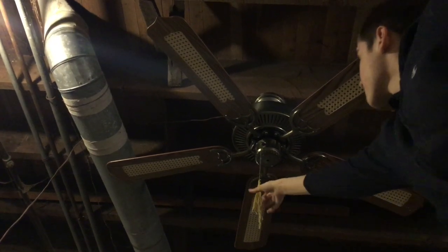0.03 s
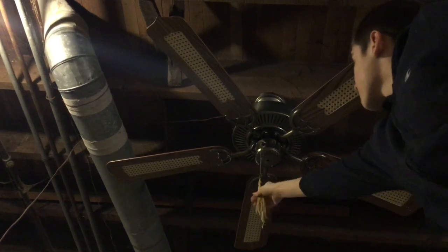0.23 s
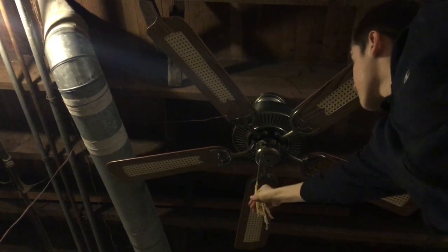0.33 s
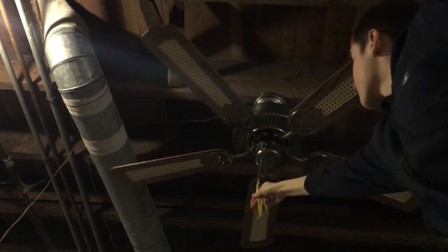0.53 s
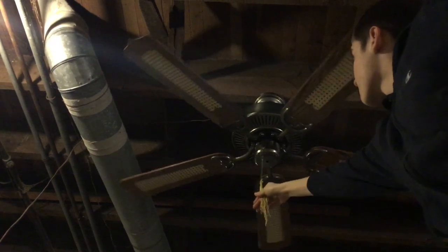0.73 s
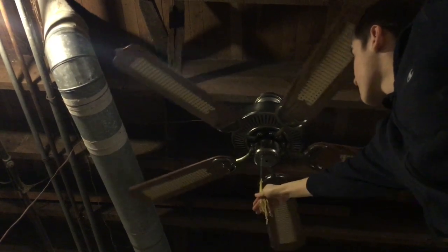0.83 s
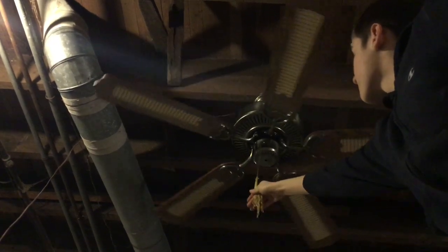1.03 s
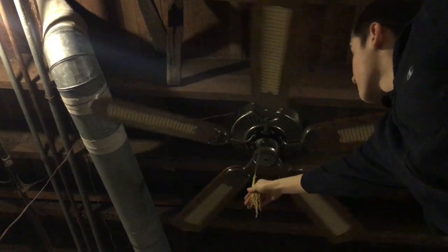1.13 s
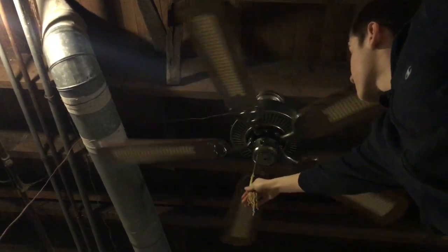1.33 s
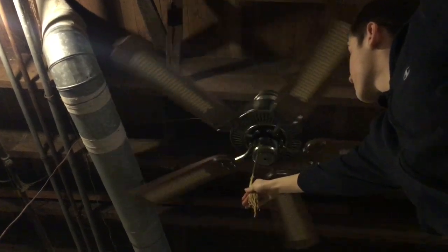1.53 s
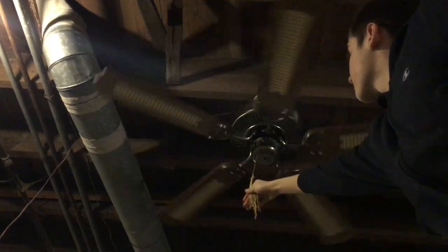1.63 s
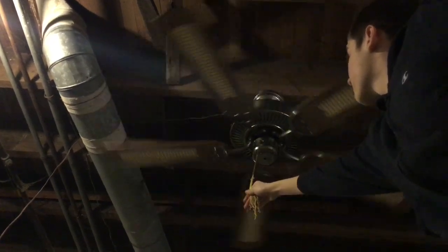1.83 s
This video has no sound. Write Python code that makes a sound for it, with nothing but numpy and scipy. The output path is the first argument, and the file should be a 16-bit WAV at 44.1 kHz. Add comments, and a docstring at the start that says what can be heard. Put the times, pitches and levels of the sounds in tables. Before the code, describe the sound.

A ceiling fan's pull-chain switch ticks quickly around 0.4 seconds and snaps sharply at 0.6, with a brief metallic ring in a quiet basement. Dull hollow knocks and soft low thumps, like handling close to the microphone, cluster from 0.2 to 1.1 seconds, with another clear knock at 1.6. After the snap, a faint motor hum fades in and continues over low rumble and hiss.

```python
"""Dull hollow knocks and soft low thumps, probably from handling, close to the microphone.
Among them a ceiling fan is switched on by its pull chain, in a quiet basement: the switch ticks as
the chain is drawn and snaps as it is let go, ringing its metal housing and the room.
The motor then hums faintly on the mains, over low rumble and hiss. One microphone, mono."""
import sys
import numpy as np
from scipy import signal
from scipy.fft import rfft, irfft
from scipy.io import wavfile

SR = 44100
rng = np.random.default_rng(int(sys.argv[2]) if len(sys.argv) > 2 else 0)


def dump(signal):
    """Clip the signal to [-1, 1] and save it as 16-bit WAV at the path in sys.argv[1]."""
    limited = np.clip(np.atleast_2d(signal).T, -1, 1)
    pcm = np.round(limited * 32767).astype(np.int16)
    wavfile.write(sys.argv[1], SR, pcm)


N = 83790
T = np.arange(N) / SR
BIN_HZ = np.arange(1, N // 2 + 2) * SR / N   # spectrum axis, one bin up to avoid 0 Hz


def pull_switch():
    """The pawl snaps and rings, the basement answers, and the metal housing colours each click."""
    # ticks and snaps of the switch: (time [s], level [dB], treble tilt [dB per two octaves])
    clicks = [(.3605, -43, -10), (.372, -20.5, -20.5), (.385, -27, 0), (.4142, -13.5, -7),
              (.4286, -8.5, -4.5), (.6115, -17, -2.5), (.632, -1, -1)]
    # ring of the pawl: (frequency [Hz], level [dB], T60 [s])
    pawl_modes = [(1330, -54.5, 0.018), (3220, -46, 0.018), (4250, -43.5, .012), (4910, -51, 0.015),
                  (7220, -50.5, 0.02), (9200, -46, .008), (11270, -47, 0.009)]
    # resonances of the housing: (frequency [Hz], width [Hz], gain [dB])
    housing_modes = [(720, 35, 5.5), (1169, 50, 4), (1320, 120, -0.5), (2155, 72, 7), (2353, 12, -11),
                     (2616, 10, 3), (3040, 38, -2.5), (3200, 480, 2), (4555, 120, 9), (5260, 220, 0),
                     (7370, 200, 2.5), (8450, 170, 3), (11860, 400, 6)]
    # the snap, heard direct: (frequency [Hz], density [dB])
    snap_spectrum = [(700, -15), (1300, 2), (2200, 10.5), (3200, 7.5), (3800, 5), (4700, 11.5),
                     (6200, -5.5), (7800, 9.5), (11500, -3), (15500, -11)]
    # the snap, back off the walls: (frequency [Hz], density [dB])
    room_spectrum = [(500, 5.5), (750, 3.5), (1600, -7), (2200, -3.5), (3300, -6.5), (4800, -8),
                     (6200, -15), (8000, -8.5), (11500, -17), (15500, -15)]
    # reverberation time of the basement: (frequency [Hz], T60 [s])
    room_t60s = [(500, 0.62), (1850, 0.69), (4880, 0.56), (8000, .34), (13000, 0.23)]
    hold_s, room_delay_s = 0.0024, 0.0052
    snap, early = noise(snap_spectrum), noise(room_spectrum)
    tail = from_db(-56) * noise(room_spectrum, room_t60s)
    burst = from_db(-48) * decay(t60=0.012, after_s=hold_s)
    pawl = sum(from_db(db) * decay(t60) * np.sin(2 * np.pi * hz * T) for hz, db, t60 in pawl_modes)
    pawl *= ramp(hold_s / 2)
    out = 0
    for start_s, db, tilt_db in clicks:
        room = tail + from_db(-51.5) * fresh(early) * decay(t60=0.2)
        click = pawl + burst * fresh(snap) + delayed(room, room_delay_s)
        out += from_db(db) * delayed(tilted(click, tilt_db), start_s)
    return resonant(out, housing_modes)


def knocks():
    """Each close knock travels as a bending wave, treble first, rings a shell and is reflected once."""
    # contacts on the hollow shell: (time [s], level [dB], hardness [dB per octave])
    contacts = [(.012, -33, 3.5), (0.177, -23.5, 0), (0.2304, -4, 3.5), (0.2431, -2, -3),
                (0.285, -19.5, -5), (0.348, -10, -3), (0.3597, -12.5, -1), (0.4707, -6, -2.5),
                (.508, -5, 0.5), (0.682, -3, -2), (0.7228, -14, -8), (.8325, -18.5, 1.5), (0.9248, -11, -3),
                (1.068, -12.5, -10.5), (1.593, -1, 2), (1.6946, -18.5, 0.5), (1.7803, -17.5, -4.5)]
    # the dull contact: (frequency [Hz], density [dB])
    contact_spectrum = [(40, -19), (100, 1.5), (300, -2.5), (750, -8), (1050, -21.5), (1600, -23),
                        (2100, -39.5), (3300, -38), (4000, -52), (6000, -89), (12000, -104)]
    # its woody edge: (frequency [Hz], density [dB])
    crack_spectrum = [(700, 13), (1100, 5.5), (1700, -1), (2050, -11), (2800, -7), (3500, -18), (4200, -30),
                      (6000, -39)]
    # resonances of the shell: (frequency [Hz], width [Hz], gain [dB])
    shell_modes = [(134.3, 9.2, 10.5), (204, 10.3, 18), (299.7, 35.5, 22), (356, 10, 6), (503, 14, -4.5),
                   (660, 110, -10), (794.2, 24, 12.5), (889, 6.7, 7.5), (1398, 64, -3), (1852, 15, 1),
                   (2308, 45, 10.5), (2687, 42, 10), (3520, 220, -5)]
    travel_s, reference_hz = 0.004914, 300   # the wave's travel time at this frequency
    phase_delay_s = 2 * travel_s * np.sqrt(reference_hz / BIN_HZ)
    octaves_above = np.clip(np.log2(BIN_HZ / reference_hz), 0, 2)
    scatter, crack = noise(contact_spectrum), noise(crack_spectrum)
    out = 0
    for start_s, db, hard_db in contacts:
        gain = from_db(at_hz(contact_spectrum, BIN_HZ) + hard_db * octaves_above)
        pulse = irfft(gain * np.exp(-2j * np.pi * BIN_HZ * (start_s + phase_delay_s)), N)
        after_ring = from_db(-55 + hard_db) * fresh(scatter) * decay(t60=0.14) * ramp(2 * travel_s)
        edge = from_db(-53 + 2 * hard_db) * fresh(crack) * decay(t60=0.036) * ramp(travel_s / 2)
        out += from_db(db) * (pulse + delayed(after_ring + edge, start_s + travel_s / 2))
    shell = resonant(out, shell_modes)
    reflection = from_db(-13.5) * delayed(shell, seconds=0.0131)
    return shell + reflection


def thumps():
    """Soft pushes near the microphone swell a low resonance, which then dies away."""
    # soft pushes: (time [s], level [dB], pitch [Hz], rise [s])
    pushes = [(.348, -49.5, 177.3, .008), (.358, -36, 100.8, 0.014), (0.417, -38.5, 89.2, 0.048),
              (0.466, -35.5, 88.3, 0.039), (0.503, -46.5, 80.9, 0.038), (.555, -38.5, 83.8, 0.017),
              (0.609, -45.5, 66.3, 0.051), (0.651, -44.5, 94.5, 0.059), (.71, -37.5, 90, 0.0092),
              (0.786, -50.5, 76, 0.036), (.927, -52, 126, 0.0057), (1.019, -55, 73.4, 0.037),
              (1.443, -53, 138.4, 0.0082), (1.469, -47, 98.6, 0.012), (1.599, -52.5, 110, 0.006),
              (1.782, -52, 119, 0.012)]
    hold_s = 0.0079
    out = 0
    for start_s, db, hz, rise_s in pushes:
        envelope = np.sin(np.pi / 2 * ramp(rise_s)) * decay(t60=0.12, after_s=rise_s + hold_s)
        out += delayed(from_db(db) * envelope * np.sin(2 * np.pi * hz * T), start_s)
    return out


def motor():
    """The fan overhead hums on even mains harmonics once the switch has closed; each wavers a little."""
    # motor hum: (multiple of the mains frequency, level [dB])
    harmonics = [(2, -65.5), (4, -65.5), (6, -65), (8, -72.5), (10, -87)]
    mains_hz, waver_db = 60, 0.3
    knots = np.linspace(0, T[-1], 30)
    out = 0
    for order, db in harmonics:
        waver = np.interp(T, knots, rng.standard_normal(len(knots)))
        cycles = order * mains_hz * T + rng.random()
        out += from_db(db + waver_db * waver) * np.sin(2 * np.pi * cycles)
    return out * ramp(rise_s=0.63, after_s=0.63)


def scuffs():
    """Something being handled gives short swells of dull friction noise."""
    # brief rubs: (time [s], length [s], level [dB])
    rubs = [(.008, 0.031, -68), (0.359, 0.038, -58.5), (0.829, 0.026, -63), (.915, 0.036, -61.5)]
    # friction noise: (frequency [Hz], density [dB])
    friction_spectrum = [(250, 2.5), (450, 6), (800, -3), (1500, -4), (2100, -12), (3200, -24.5),
                         (5000, -36)]
    swells = sum(from_db(db) * np.sin(np.pi * ramp(length_s, start_s)) for start_s, length_s, db in rubs)
    return swells * noise(friction_spectrum)


def room_tone():
    """The basement behind it all: uneven low rumble, steady hiss and a fading rustle."""
    # rise and fall of the rumble: (time [s], level [dB])
    rumble_levels = [(0, -58), (.16, -69.5), (.33, -64), (.42, -51), (.75, -58.5), (.9, -55), (1.13, -64.5),
                     (1.25, -64), (1.4, -61), (1.9, -64.5)]
    # low rumble: (frequency [Hz], density [dB])
    rumble_spectrum = [(30, -24.5), (48, -21.5), (68, -1), (100, -8.5), (150, -9.5), (300, -17.5),
                       (500, -23), (800, -34), (1500, -46)]
    # broad hiss: (frequency [Hz], density [dB])
    hiss_spectrum = [(100, 9.5), (400, 4.5), (800, 7), (1500, 2.5), (3000, 1.5), (6000, -2), (12000, -3.5),
                     (16000, -12.5)]
    # faint rustle: (frequency [Hz], density [dB])
    rustle_spectrum = [(250, 4.5), (500, 21.5), (800, -11), (1600, 1.5), (3300, -5.5), (4800, -11)]
    rumble = from_db(np.interp(T, *np.transpose(rumble_levels))) * noise(rumble_spectrum)
    hiss = from_db(-79.5) * noise(hiss_spectrum)
    rustle = from_db(-67.5) * decay(t60=1.7) * noise(rustle_spectrum)
    return rumble + hiss + rustle


def from_db(db):
    """Decibels to gain."""
    return 10 ** (np.asarray(db) / 20)


def at_hz(points, hz):
    """Read a table on a log-frequency axis."""
    frequencies, values = np.transpose(points)
    return np.interp(np.log(hz), np.log(frequencies), values)


def ramp(rise_s, after_s=0):
    """Wait, then rise in a straight line from 0 to 1."""
    return np.clip((T - after_s) / rise_s, 0, 1)


def decay(t60, after_s=0):
    """Hold at 1, then fall 60 dB every t60 seconds."""
    return from_db(-60 * np.clip((T - after_s) / t60, 0, 5))


def delayed(x, seconds):
    """Shift a sound later."""
    return np.interp(T - seconds, T, x, left=0)


def noise(spectrum, t60s=None):
    """Third-octave noise bands that sum to unit rms; given t60s, each then dies at its own rate."""
    white = rng.standard_normal((2, N))
    edges_hz = 20 * 2 ** (np.arange(30) / 3)
    steady, out = 0, 0
    for k, (low, high) in enumerate(zip(edges_hz, edges_hz[1:])):
        hz = np.sqrt(low * high)
        bandpass = signal.butter(2, [low, high], "band", fs=SR, output="sos")
        roll_off = min(1, hz / spectrum[0][0], spectrum[-1][0] / hz) ** 2   # past the table's ends
        band = from_db(at_hz(spectrum, hz)) * roll_off * signal.sosfilt(bandpass, white[k % 2])
        steady += band
        out += band * decay(at_hz(t60s, hz)) if t60s else band
    return out / np.std(steady)


def fresh(x):
    """Another stretch of the same steady noise."""
    return np.roll(x, rng.integers(N))


def tilted(x, tilt_db, pivot_hz=3000):
    """Tip the treble against the bass by tilt_db per two octaves around a pivot."""
    octaves = np.clip(np.log2(BIN_HZ / pivot_hz), -1, 2)
    return irfft(rfft(x) * from_db(tilt_db / 2 * octaves), N)


def resonant(x, modes):
    """A body adds the ring of each of its resonances to the sound that drives it."""
    out = x
    for hz, width_hz, db in modes:
        radius = np.exp(-np.pi * width_hz / SR)
        feedback = [1, -2 * radius * np.cos(2 * np.pi * hz / SR), radius ** 2]
        ring = (1 - radius ** 2) / 2 * signal.lfilter([1, 0, -1], feedback, x + 1e-18)
        out = out + from_db(db) * ring
    return out


def scene():
    """All sources at one microphone in the basement."""
    return (pull_switch() + knocks() + thumps() + motor() + room_tone() + scuffs())[None]


def record(dry):
    """A low cut at 42 Hz and a steep high cut at 15.9 kHz on the microphone."""
    low_cut = signal.butter(4, 42, "high", fs=SR, output="sos")
    high_cut = signal.ellip(10, 0.1, 70, 15900, fs=SR, output="sos")
    return signal.sosfilt(high_cut, signal.sosfilt(low_cut, dry))


dry = scene()
out = record(dry)
dump(out)
```